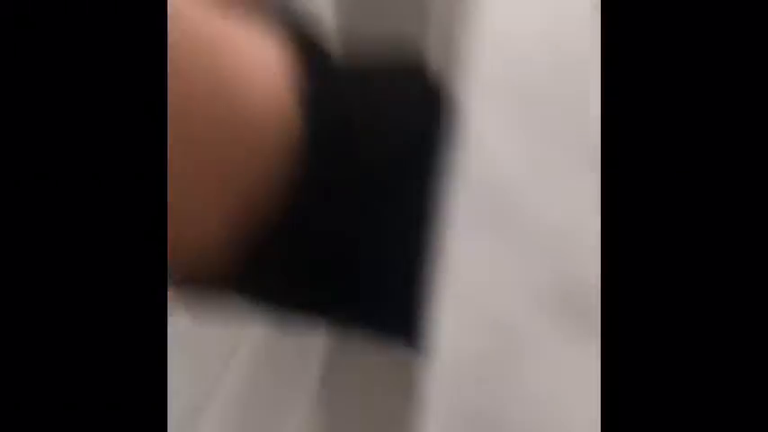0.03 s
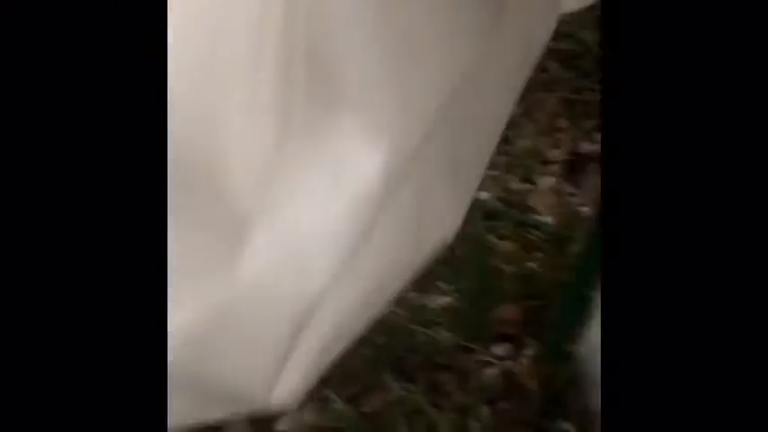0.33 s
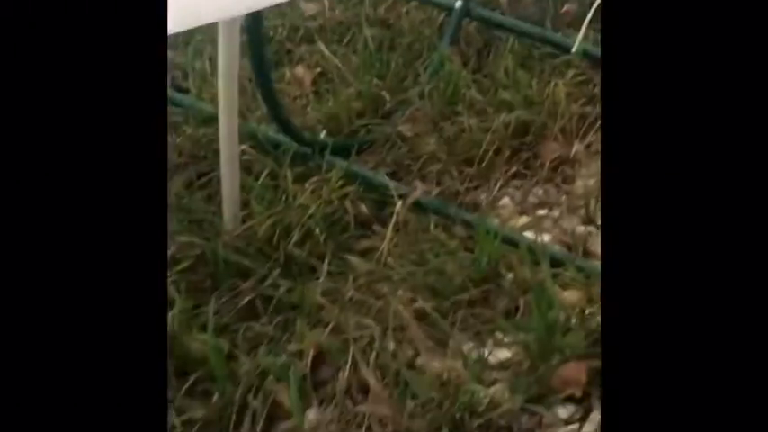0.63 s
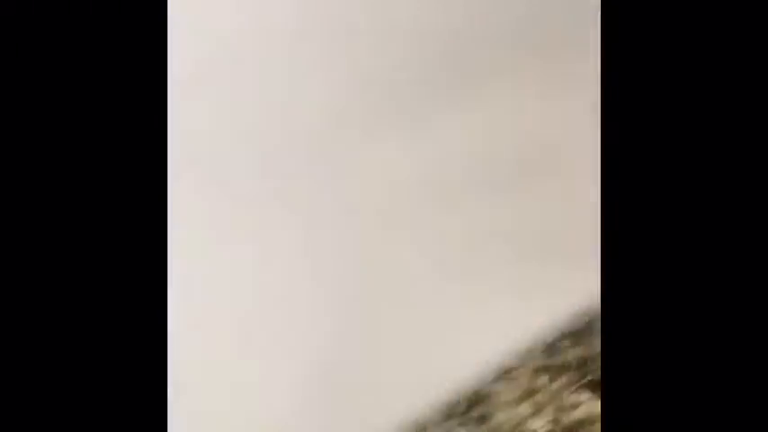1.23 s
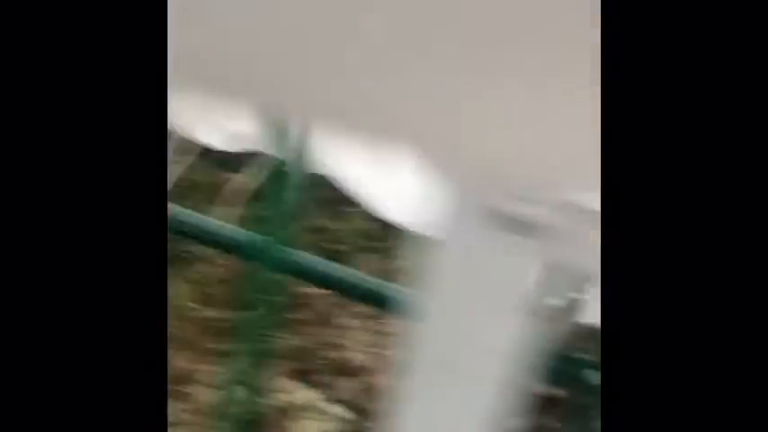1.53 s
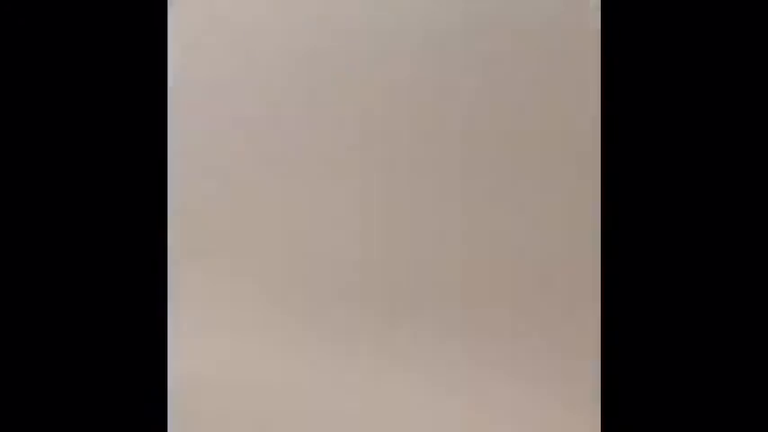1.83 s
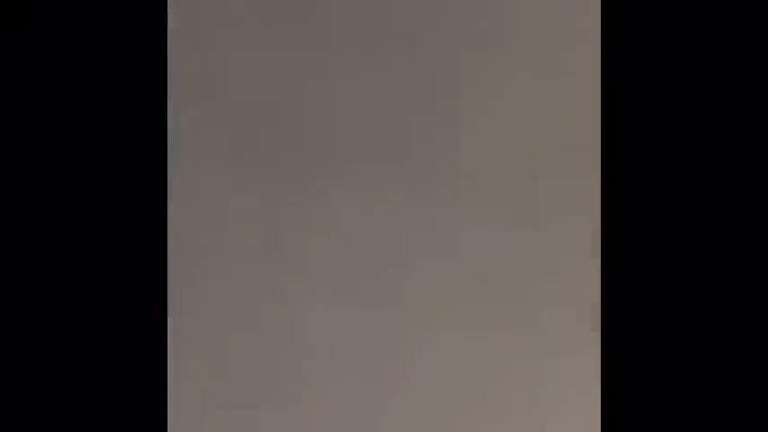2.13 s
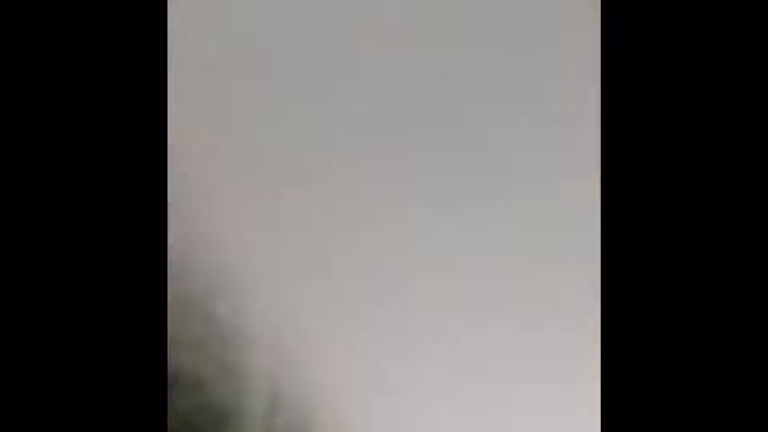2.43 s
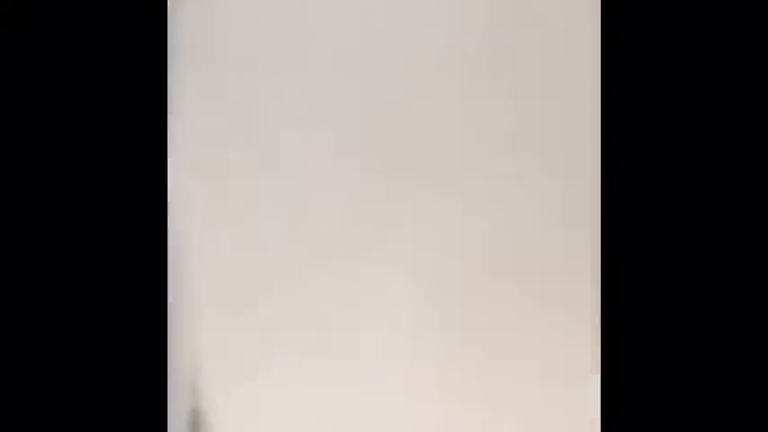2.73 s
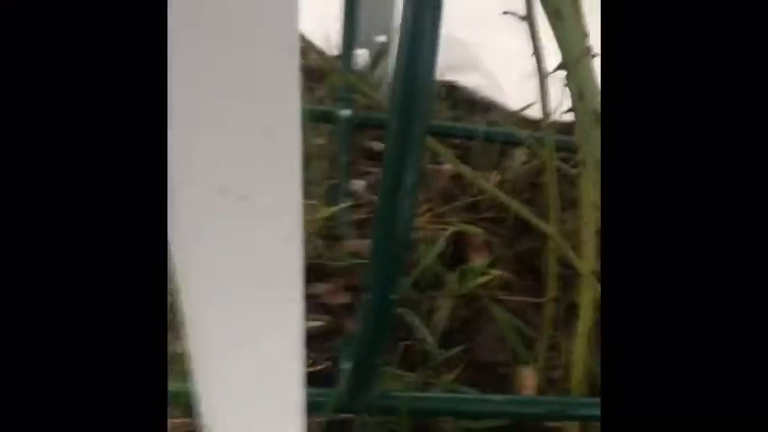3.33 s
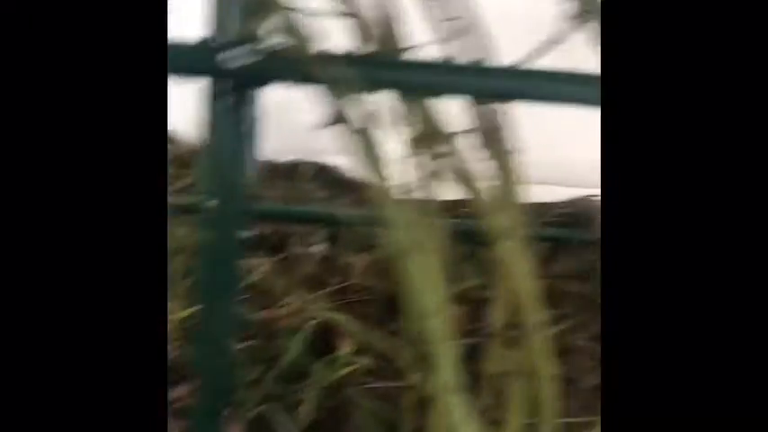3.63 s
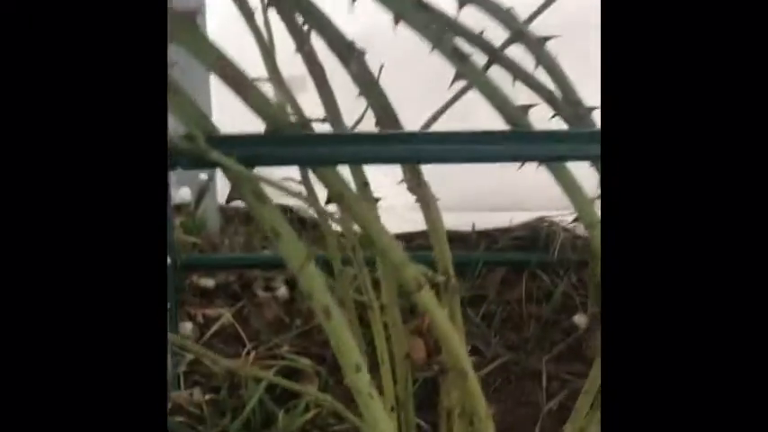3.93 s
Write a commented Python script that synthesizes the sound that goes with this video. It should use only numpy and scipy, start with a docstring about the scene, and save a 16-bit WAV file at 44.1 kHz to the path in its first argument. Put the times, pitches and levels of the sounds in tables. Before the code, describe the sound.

A light fabric cover rustles close up as it is pulled over a garden frame. It starts with a soft sliding hiss, small crinkles and a dull flap near 0.9 seconds. From 1.4 to 3 seconds it is loudest, flapping with low thumps, swishes and rumbling air, with a few bright ticks around 2 seconds. After 3 seconds it fades to light brushing over faint outdoor background.

```python
"""A soft hiss and a few dry crinkles: a light fabric cover is pulled over a garden frame, close up, in wind.
Sliding fibres hiss, buckling folds rustle, and the billowing sheet pushes a low rumble of air.
The cloth flaps with dull thumps as it pulls taut, busiest in the middle, while creases crinkle,
snagged fibres tick and quick slips swish. It all settles towards the end, over a faint garden bed."""
import sys
import numpy as np
from scipy import signal
from scipy.fft import rfft, irfft, next_fast_len
from scipy.io import wavfile
from scipy.ndimage import map_coordinates

SR = 44100
rng = np.random.default_rng(int(sys.argv[2]) if len(sys.argv) > 2 else 0)


def master_out(mix):
    """Clip the mix to full scale and print it as 16-bit PCM to the path in sys.argv[1]."""
    frames = np.transpose(np.atleast_2d(mix))
    ceiling = np.clip(frames, -1, 1)
    pcm = np.round(ceiling * 32767).astype(np.int16)
    wavfile.write(sys.argv[1], SR, pcm)


N = 176400

# Fader rides for the billow, the sliding hiss and the folding rustle, before trim: time_s, level_db
BILLOW_RIDE = [(0, -48.5), (.14, -45), (.22, -52), (.5, -48.5), (.68, -40.5), (.76, -45.5), (.88, -38.5),
               (.95, -43), (1.09, -44.5), (1.14, -40), (1.2, -46), (1.36, -36), (1.47, -29), (1.58, -35.5),
               (1.8, -35.5), (1.85, -39.5), (2.02, -35.5), (2.17, -29.5), (2.36, -34), (2.45, -39),
               (2.64, -32.5), (2.72, -42), (2.81, -41), (2.9, -47), (2.96, -42.5), (3.14, -44.5),
               (3.21, -57.5), (4, -59)]
SLIDE_RIDE = [(0.0, -54), (0.1, -49.0), (0.17, -55.5), (0.27, -51.5), (0.47, -52.0), (0.58, -47),
              (0.79, -52.5), (1.1, -51.5), (1.41, -48.5), (1.462, -51), (1.485, -45.5), (1.578, -44),
              (1.6, -52), (1.72, -44.5), (1.8, -50), (1.89, -44), (2.0, -54), (2.09, -53), (2.143, -43),
              (2.2, -53.5), (2.315, -51), (2.345, -43), (2.45, -52.5), (2.495, -44), (2.58, -43.5),
              (2.6, -47), (2.75, -48.5), (2.88, -54), (3.1, -57.5), (3.18, -64.5), (3.31, -58.5),
              (3.38, -64.5), (3.45, -63.5), (3.55, -72), (3.63, -65.5), (3.79, -66.5), (3.81, -70.5),
              (4.0, -72)]
FOLD_RIDE = [(0.0, -59.5), (0.12, -49), (0.2, -59), (0.275, -53), (0.33, -55.5), (0.54, -57.5), (0.68, -51),
             (0.75, -53.5), (0.87, -49), (0.93, -57.5), (1.2, -53.5), (1.39, -44.5), (1.515, -38),
             (1.6, -46.5), (1.73, -40.5), (1.77, -45), (1.9, -44), (2.01, -48.5), (2.165, -36),
             (2.24, -47.5), (2.36, -35), (2.44, -41.5), (2.5, -35.5), (2.68, -46.5), (3.18, -56.5),
             (3.28, -54), (3.39, -63), (3.44, -58.5), (3.56, -68), (3.685, -62), (3.8, -60.5), (3.88, -67),
             (3.97, -63)]

# Tone of the garden bed, the pushed air and the folds: frequency_hz, gain_db
GARDEN_EQ = [(25, -11), (70, 6), (200, -12.5), (500, -24.5), (1100, -8.5), (2500, -37.5)]
AIR_EQ = [(20, -33), (33, -14), (48, 3.5), (75, 1.5), (130, -0.5), (260, -9.5), (500, -21.5), (1500, -50.5)]
RUSTLE_EQ = [(60, -15), (180, 3), (330, 2.5), (550, -2.5), (1100, -6.5), (1900, -14.5), (3500, -22),
             (8000, -50)]
# Tone of the sliding fibres, low roll-off and bright body: frequency_hz, gain_db
HISS_LOW_EQ = [(100, -32), (700, 1)]
HISS_BODY_EQ = [(1180, 0), (2000, -3), (2610, -2), (4460, -3), (4950, -6), (6690, -4), (7680, -8),
                (8810, -4), (10600, -9.5), (11400, -5.5), (12700, -5.5), (15000, -5), (15700, -10.5)]

# Cloth swishes over cloth or stems: start_s, length_s, level_db, centre_hz
BRUSH_CUES = [(0.252, 0.039, -53, 900), (0.481, .045, -53, 4000), (0.863, 0.047, -51, 3200),
              (1.475, 0.052, -43, 13000), (1.545, 0.032, -44.5, 7700), (2.124, 0.048, -43.5, 1300),
              (2.555, .04, -47.5, 12000), (3.422, 0.03, -62.5, 1800), (3.774, 0.036, -57.5, 2580)]
# Snagged fibres let go: start_s, peak_db
TICK_CUES = [(2.016, -31), (2.039, -23.5), (2.042, -35), (2.076, -30.5), (2.225, -34), (2.915, -36)]
# Creases give way, before trim: start_s, peak_db, pitch_hz
CREASE_CUES = [(.038, -37, 1300), (0.087, -37, 990), (0.104, -33, 895), (0.118, -32.5, 890),
               (.140, -32.5, 1480), (1.152, -30.5, 960), (1.518, -23, 850), (1.748, -23.5, 890),
               (3.194, -37, 1150), (3.367, -40.5, 1000)]
# The cloth pulls taut and pushes the air: start_s, push_db, pitch_hz
FLAP_CUES = [(0.093, -31.5, 233), (.341, -34, 300), (.495, -35, 294), (0.648, -32.5, 130),
             (.869, -27.5, 320), (.871, -19.5, 126), (1.436, -19, 300), (1.445, -16, 229),
             (1.464, -18.5, 170), (1.490, -17, 152), (1.519, -15.5, 282), (1.577, -22, 400),
             (1.627, -23.5, 190), (1.653, -27, 330), (1.657, -15, 115), (2.086, -22, 162),
             (2.151, -17.5, 150), (2.212, -15.5, 304), (2.283, -13.5, 330), (2.287, -24, 133),
             (2.589, -21.5, 255), (2.594, -20.5, 104), (2.657, -26.5, 130), (2.751, -21, 285),
             (2.757, -16, 76), (2.804, -25, 83), (2.957, -24, 89.5), (2.977, -17.5, 88), (3.261, -30, 600),
             (3.277, -39.5, 130), (3.453, -44, 80)]

BILLOW_TRIM_DB, SLIDE_TRIM_DB, FOLD_TRIM_DB, CREASE_TRIM_DB = 1.5, 2.5, 2.5, -1
TOP_HZ = 15850


def amp(db):
    return 10 ** (np.asarray(db) / 20)


def unit_rms(x):
    return x / np.sqrt(np.mean(x ** 2) + 1e-20)


def fader(ride, trim_db, flutter_db, flutter_per_s):
    """Gain that follows a level ride, with a smooth random flutter on top."""
    t = np.arange(N) / SR
    flutter = map_coordinates(rng.standard_normal(4000), [t * flutter_per_s], mode="wrap")
    return amp(np.interp(t, *np.transpose(ride)) + trim_db + flutter_db * flutter)


def equalise(x, eq):
    """Shape x with a minimum-phase EQ curve and bring it to rms 1."""
    size = next_fast_len(N + SR // 2)
    hz, db = np.transpose(eq)
    gain_db = np.interp(np.log(np.fft.rfftfreq(size, 1 / SR) + 1), np.log(hz), db)
    cepstrum = irfft(np.log(amp(gain_db)), size)
    cepstrum[1:size // 2] *= 2  # one-sided, so nothing rings ahead of an attack
    cepstrum[size // 2 + 1:] = 0
    return unit_rms(irfft(rfft(x, size) * np.exp(rfft(cepstrum)), size)[:N])


def grains(per_s, spread_db, smooth):
    """Friction texture: tiny random slips of uneven size over a share of smooth noise."""
    slips = (rng.random(N) < per_s / SR) * rng.choice([-1, 1], N)
    sizes = amp(spread_db * np.clip(rng.standard_normal(N), -2, 2))
    return unit_rms(slips * sizes) + smooth * rng.standard_normal(N)


def add(track, start_s, x):
    i = round(start_s * SR)
    track[i:i + len(x)] += x[:N - i]


def garden():
    """A faint, steady outdoor bed: low rumble with a breath of midrange."""
    return amp(-59.5) * equalise(rng.standard_normal(N), GARDEN_EQ)


def billow():
    """The moving sheet pushes air over the microphone in low swells."""
    air = equalise(rng.standard_normal(N), AIR_EQ)
    return air * fader(BILLOW_RIDE, BILLOW_TRIM_DB, flutter_db=0.94, flutter_per_s=11)


def slide():
    """Fibres rub past each other: a bright, slightly grainy hiss."""
    friction = grains(per_s=3000, spread_db=7, smooth=1.7)
    hiss = equalise(friction, list(HISS_LOW_EQ) + list(HISS_BODY_EQ))
    return hiss * fader(SLIDE_RIDE, SLIDE_TRIM_DB, flutter_db=1.04, flutter_per_s=60)


def fold():
    """Folds buckle in quick succession: a dull, fluttering rustle."""
    buckles = equalise(grains(per_s=920, spread_db=4, smooth=0.97), RUSTLE_EQ)
    return buckles * fader(FOLD_RIDE, FOLD_TRIM_DB, flutter_db=1.43, flutter_per_s=55)


def brushes(edge_ratio=1.37, fade_share=0.47):
    """The cloth swishes briefly over itself or over stems; faster slips sound brighter."""
    out = np.zeros(N)
    slips = grains(per_s=2800, spread_db=4.5, smooth=0.81)
    for start_s, length_s, level_db, hz in BRUSH_CUES:
        edges_hz = [hz / edge_ratio, min(hz * edge_ratio, TOP_HZ)]
        band = signal.butter(2, edges_hz, "band", fs=SR, output="sos")
        swish = unit_rms(signal.sosfilt(band, slips))[round(start_s * SR):]
        swell = signal.windows.tukey(int(length_s * SR), fade_share)
        add(out, start_s, amp(level_db) * swell * swish[:len(swell)])
    return out


def ticks(low_cut_hz=5030, t60_s=0.0045):
    """Snagged fibres let go close up: very short, bright ticks."""
    out, t = np.zeros(N), np.arange(SR // 100) / SR
    low_cut = signal.butter(2, low_cut_hz, "high", fs=SR, output="sos")
    bright = signal.sosfilt(low_cut, rng.standard_normal(N))
    for start_s, peak_db in TICK_CUES:
        tick = bright[round(start_s * SR):][:len(t)] * amp(-60 * t / t60_s)
        add(out, start_s, amp(peak_db) * tick / np.abs(tick).max())
    return out


def creases(edge_ratio=1.5, t60_s=0.019):
    """Creases give way in tiny buckles, heard as one short, dry burst of crinkle each."""
    out, t = np.zeros(N), np.arange(SR // 20) / SR
    for start_s, peak_db, hz in CREASE_CUES:
        band = signal.butter(2, [hz / edge_ratio, hz * edge_ratio], "band", fs=SR, output="sos")
        crinkle = signal.sosfilt(band, rng.standard_normal(len(t)) * amp(-60 * t / t60_s))
        add(out, start_s, amp(peak_db + CREASE_TRIM_DB) * crinkle / np.abs(crinkle).max())
    return out


def flaps(recoil_ratio=0.64, puff_db=-17.5, puff_t60_s=0.024, shake_db=-20, shake_t60_s=0.072):
    """Each thump is one push of air with a recoil, a puff of rustle and a shake of the taut sheet."""
    out, t = np.zeros(N), np.arange(SR // 8) / SR
    rustle = equalise(rng.standard_normal(N), RUSTLE_EQ)
    for start_s, push_db, hz in FLAP_CUES:
        phase = 2 * np.pi * hz * t
        recoil = signal.butter(3, recoil_ratio * hz, "high", fs=SR, output="sos")
        push = signal.sosfilt(recoil, phase ** 2.61 * np.exp(-1.25 * phase))  # low cut swings it back
        puff = rustle[round(start_s * SR):][:len(t)] * amp(puff_db - 60 * t / puff_t60_s)
        shake_hz = 94.5 * np.exp(0.11 * rng.standard_normal())
        shake = np.sin(2 * np.pi * shake_hz * t) * amp(shake_db - 60 * t / shake_t60_s)
        attack = 1 - np.exp(-phase)
        add(out, start_s, amp(push_db) * (push / np.abs(push).max() + (puff + shake) * attack))
    return out


def scene():
    """Mono mix: the garden bed, the continuous cloth movement and the accents on top."""
    bed = garden()
    movement = slide() + fold() + billow()
    accents = flaps() + creases() + ticks() + brushes()
    return (bed + movement + accents)[None]


def record(dry):
    """A brick-wall high cut takes off the very top."""
    size = next_fast_len(N + SR // 2)
    passband = np.fft.rfftfreq(size, 1 / SR) < TOP_HZ
    return irfft(rfft(dry, size) * passband, size)[..., :N]


dry = scene()
out = record(dry)
master_out(out)
```